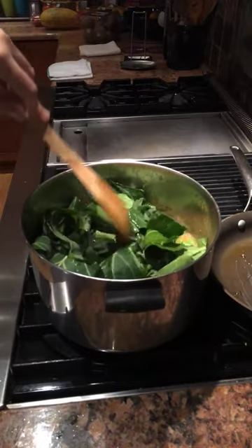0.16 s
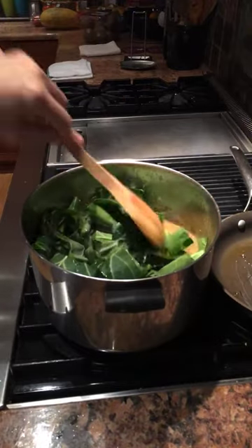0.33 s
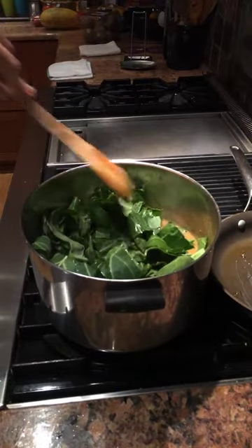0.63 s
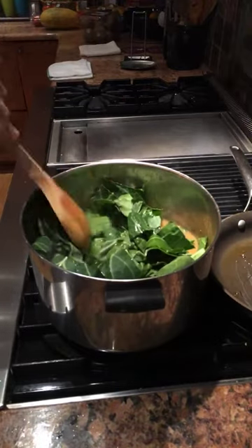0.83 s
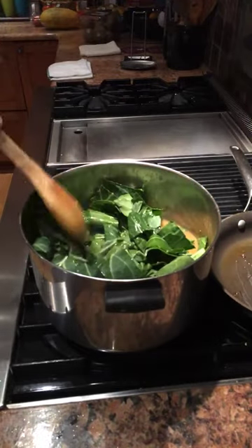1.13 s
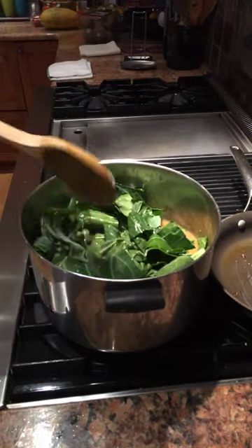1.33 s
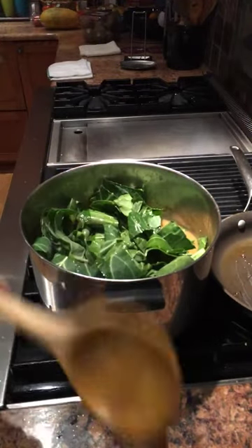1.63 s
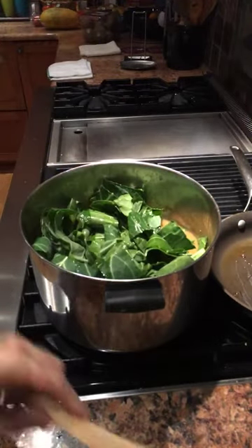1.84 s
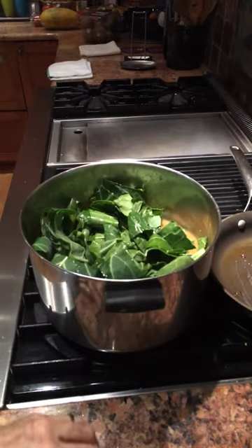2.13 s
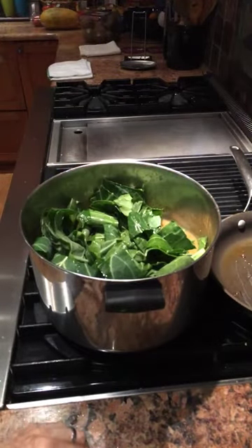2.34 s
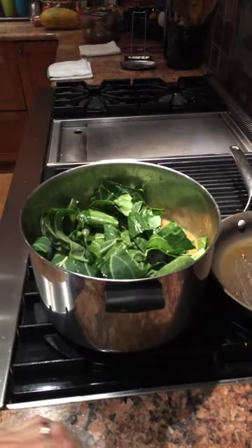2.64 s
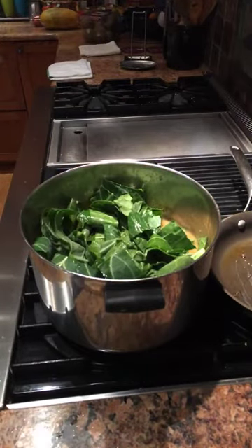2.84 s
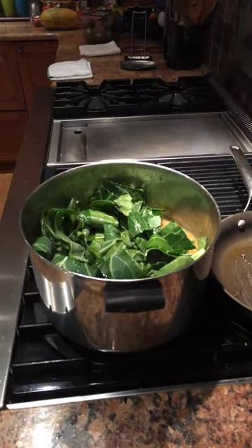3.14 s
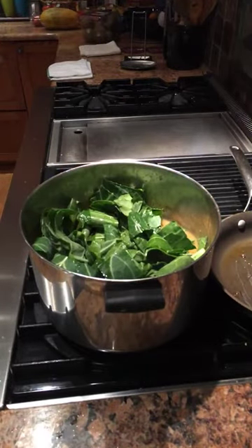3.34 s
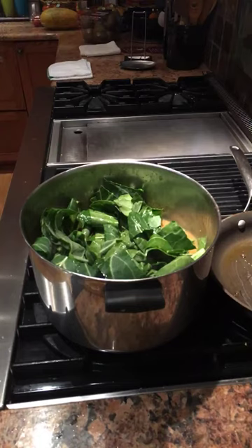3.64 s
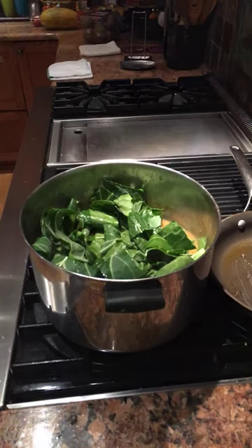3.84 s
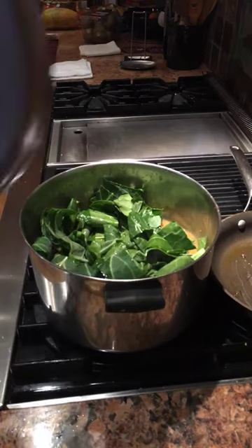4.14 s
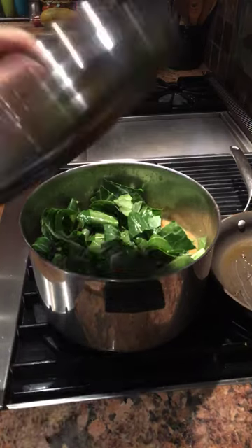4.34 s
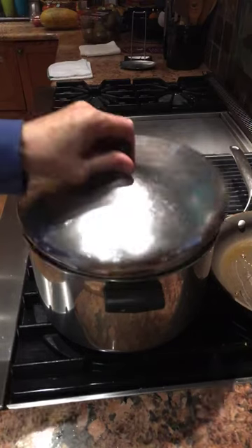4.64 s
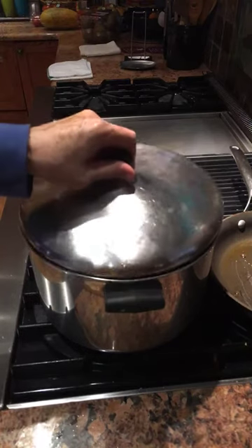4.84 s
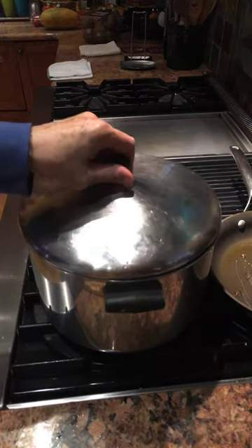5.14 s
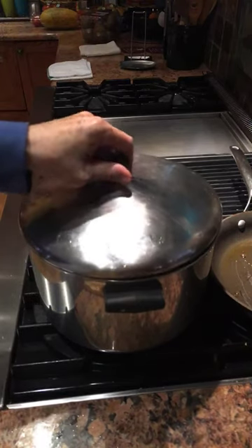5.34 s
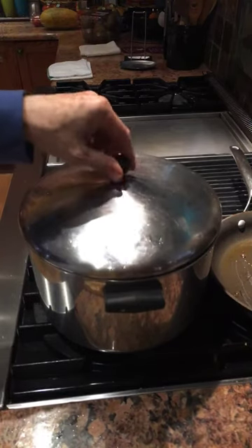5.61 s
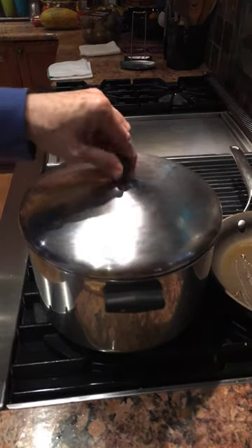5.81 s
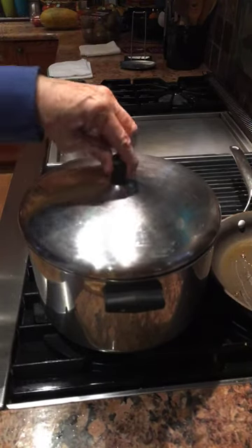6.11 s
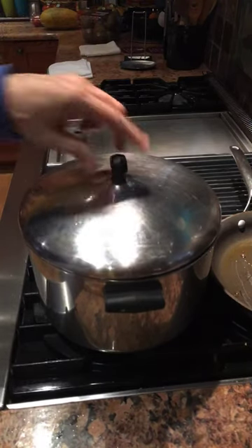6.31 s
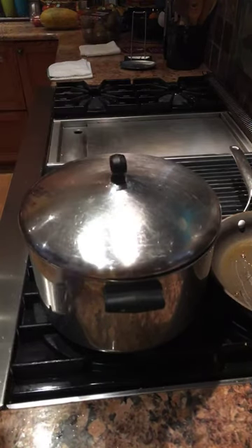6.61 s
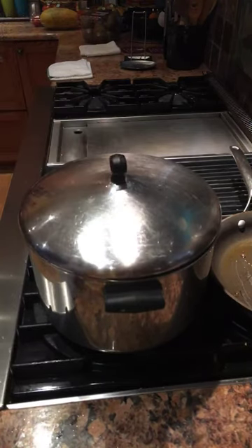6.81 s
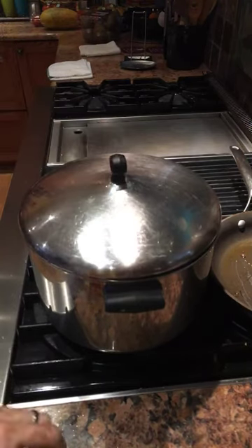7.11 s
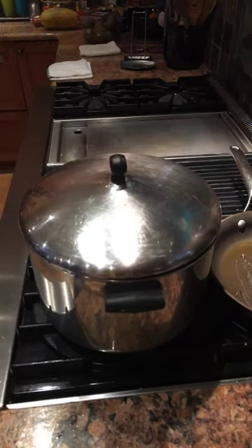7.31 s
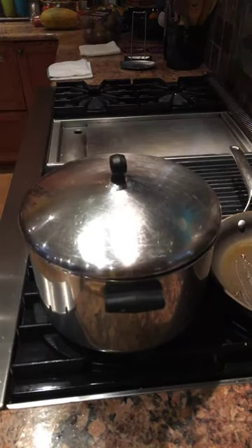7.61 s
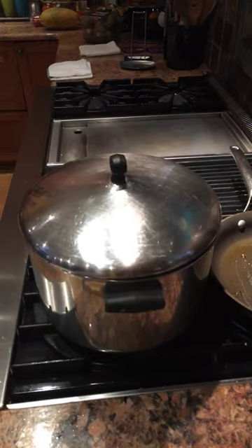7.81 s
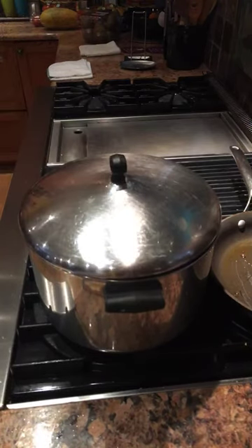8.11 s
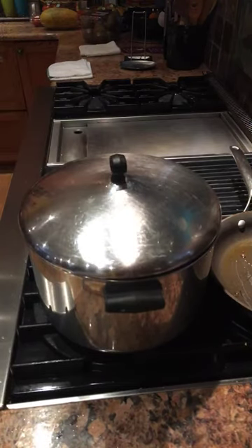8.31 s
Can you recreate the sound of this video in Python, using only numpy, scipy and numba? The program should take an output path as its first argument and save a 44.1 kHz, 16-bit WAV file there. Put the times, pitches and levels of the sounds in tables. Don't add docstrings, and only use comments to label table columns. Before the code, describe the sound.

Phone-close kitchen sound with slight hard-wall echo: muffled wooden taps on a filled pot, a faint wet squeak, then a very loud spoon clack on stone with a bright, short metallic rattle. After a quieter gap with a small lid click, a thin steel lid bounces onto the pot, rings briefly, is turned with a gritty metallic rub, and settles over steady fan hum and hiss.

```python
import sys
import numpy as np
from scipy import signal
from scipy.fft import rfft, irfft, next_fast_len
from scipy.io import wavfile
from scipy.ndimage import uniform_filter1d
from numba import njit

SR = 44100
rng = np.random.default_rng(int(sys.argv[2]) if len(sys.argv) > 2 else 0)


def log_audio(samples):
    frames = np.atleast_2d(samples).T
    limited = np.clip(frames, -1, 1)
    pcm = np.round(limited * 32767).astype(np.int16)
    wavfile.write(sys.argv[1], SR, pcm)


def volts_from_db(level):
    exponent = np.asarray(level, float) / 20
    return 10 ** exponent


N = 373084
TIME_S = np.arange(N) / SR
HARDER_DB = 1.77


def level(x, db):
    return x * volts_from_db(db) / np.sqrt(np.mean(x ** 2) + 1e-30)


def shaped(x, gain):
    size = next_fast_len(len(x))
    hz = np.arange(size // 2 + 1) * SR / size + 1
    return irfft(rfft(x, size) * gain(hz), size)[:len(x)]


def colour(x, points):
    hz, db = np.transpose(points)
    return shaped(x, lambda f: volts_from_db(np.interp(np.log(f), np.log(hz), db)))


def walk(rate_hz):
    k = int(SR / rate_hz)
    steps = np.repeat(rng.standard_normal(N // k + 1), k)
    return level(uniform_filter1d(uniform_filter1d(steps, k), k)[:N], 0)


def curves(table):
    s, *columns = np.transpose(table)
    return [np.interp(TIME_S, s, c) for c in columns]


def decay(t_s, t60_s):
    return np.exp(-np.log(1000) * t_s / t60_s)


def damped_after(s, fade_s):
    return np.exp(-np.maximum(TIME_S - s, 0) / fade_s)


def landing_db(hz, hard_db, spot_hz):
    return hard_db * np.log2(hz / 1500) + 9 * np.exp(-(np.log2(hz / spot_hz) / .35) ** 2)


def ring(modes, hard_db, spot_hz, share, longest_s, t_s, rough=0):
    hz, db, t60_s = np.transpose(modes)[:, :, None]
    luck = rng.standard_normal((3, len(modes), 1))
    fade = decay(t_s, np.clip(share * np.minimum(t60_s, longest_s), .005, 2))
    gain = volts_from_db(db + landing_db(hz, hard_db, spot_hz)) * volts_from_db(1.5 * luck[0])
    tone = np.sin(2 * np.pi * (hz + 6 * luck[1]) * t_s)
    twin = np.sin(2 * np.pi * (hz + (30 + .003 * hz) * luck[2]) * t_s)
    y = np.sum(gain * fade * (tone + rough * twin), axis=0)
    return y / np.max(np.abs(y))


def blows(hits, modes, crack, longest_s, stiff_db, push_s=0.00026):
    out = np.zeros(N + SR)
    points, t60_s = crack
    for s, db, share, spot_hz, *crack_db in hits:
        noise = rng.standard_normal(SR // 2)
        t_s = np.arange(int(SR * np.clip(share * max(t60_s, longest_s), .1, .5))) / SR
        hard_db = stiff_db + HARDER_DB * np.log2(spot_hz / 2000)
        burst = colour(noise[:len(t_s)], points)
        burst = shaped(burst, lambda f: volts_from_db(landing_db(f + 99, hard_db, spot_hz)))
        y = level(burst, sum(crack_db)) * decay(t_s, np.clip(t60_s * share, .004, 2))
        if modes:
            y += ring(modes, hard_db, spot_hz, share, longest_s, t_s, rough=.45)
        start = int(s * SR)
        out[start:start + len(t_s)] += volts_from_db(db) * y * (1 - np.exp(-t_s / push_s))
    return out[:N]


# pitch in Hz, level in dB, wander in Hz.
FAN_LINES = [(63.3, -46, 2.53), (150.7, -41, 1.2), (311, -62.5, 4), (463, -64.5, 3)]
# frequency in Hz, density in dB per Hz.
RUMBLE_COLOUR = [(8.8, -43), (15, -8.5), (42, 3.5), (77, 0), (103, -2), (167, -5.5), (190, -18), (301, -6),
                 (331, -9), (400, -35.5), (920, -120)]


def fan():
    out = level(colour(rng.standard_normal(N), RUMBLE_COLOUR), -45)
    for hz, db, wander_hz in FAN_LINES:
        gain = volts_from_db(db + 2 + 0.79 * wander_hz * walk(10))
        out += gain * np.sin(2 * np.pi * np.cumsum(hz + wander_hz * walk(10)) / SR)
    return out


# frequency in Hz, density in dB per Hz.
STEAM_COLOUR = [(210, -12.5), (350, -3), (800, -7.5), (1120, -11), (2000, -18.5), (3240, -21.5),
                (15300, -31), (16500, -57)]
REGION_EDGES_HZ = 1610, 5250
# level at rest in dB, dB per dB of bustle.
REGION_LEVELS = [(-55, 0.19), (-61.5, 1), (-67, 0.62)]
# time in seconds, level in dB.
BUSTLE_DB = [(0, -59), (.45, -56.5), (1.3, -64.5), (1.75, -55), (2.05, -60), (2.35, -55), (2.75, -63),
             (3.34, -63.5), (3.55, -57), (4.2, -57), (4.55, -62.5), (5, -53), (5.5, -62), (6.05, -56),
             (6.6, -62.5), (6.9, -53.5), (7.3, -61.5), (8.46, -59.5)]


def hiss():
    rest_db = -59.5
    grains = rng.standard_normal(N) * volts_from_db(0.58 * rng.exponential(size=N))
    noise = colour(grains, [(200, -55.0)] + STEAM_COLOUR)
    low, low_mid = [shaped(noise, lambda f: 1 / (1 + (f / hz) ** 6)) for hz in REGION_EDGES_HZ]
    bustle_db = curves(BUSTLE_DB)[0] - rest_db
    out = np.zeros(N)
    for part, (db, share) in zip((low, low_mid - low, noise - low_mid), REGION_LEVELS):
        out += level(part, 0) * volts_from_db(db + share * bustle_db + 1.8 * walk(12))
    return out


# start in seconds, level in dB, length share, favoured Hz.
TICK_HITS = [(.349, -66, 8, 9000), (.857, -46, 3.4, 3850), (.919, -55, 1, 6000), (1.136, -52.5, 3.9, 3200),
             (4.574, -43, 0.46, 1200), (5.242, -38.5, 1.1, 2113), (5.259, -34, 0.82, 602),
             (6.744, -42, 2.7, 3950), (6.746, -47, .6, 1260), (7.028, -44.5, 1.2, 1012),
             (7.292, -51, .5, 3300), (7.114, -37, 0.3, 1106), (7.168, -43, 0.51, 3740),
             (7.178, -49, 0.35, 3500), (7.312, -47, 0.57, 7240), (7.665, -47, 1.9, 750),
             (7.889, -46.5, 1.1, 1930), (8.011, -48, 0.93, 3020), (8.44, -50, 1.3, 1066)]
# start in seconds, peak in dB, length share, favoured Hz.
SNAP_HITS = [(4.32, -55, 0.09, 7000), (4.407, -50, .12, 4300), (4.555, -53, 0.073, 11000),
             (4.564, -49, .07, 13000), (4.574, -41, 0.077, 13000), (4.653, -51, .07, 13000),
             (4.66, -44, 0.08, 11700), (4.668, -50, .07, 12000), (4.695, -52, .07, 10500),
             (4.708, -48, .07, 11000), (4.805, -52, .07, 12500), (5.242, -53, .2, 9000),
             (5.258, -47, 0.27, 12000), (5.735, -42, 0.12, 6160), (7.178, -30, 0.093, 3650),
             (.7805, -33, 0.18, 2600), (1.1672, -37, .15, 2900), (2.4143, -19, 0.086, 4000),
             (2.511, -36, .15, 1100)]
# rows of frequency in Hz and dB per Hz, then t60 in seconds.
TICK_NOISE = ([(290, -43), (500, -4.5), (952, 0.5), (1840, -6), (3710, -15), (15300, -22), (16500, -40)],
               0.097)


def ticks():
    soft = blows(TICK_HITS, [], TICK_NOISE, .1, stiff_db=0.5, push_s=0.0012)
    return soft + blows(SNAP_HITS, [], TICK_NOISE, .1, stiff_db=1.0)


# centre in
# seconds, half length in seconds, level in dB, centre Hz.
NOISE_SWELLS = [(0.41, 0.031, -59, 9000), (2.2, 0.0621, -60.5, 9200), (3.62, 0.3, -61.5, 10900),
                (4.19, .087, -63, 11000), (2.2, 0.012, -38.5, 12000), (2.185, 0.045, -29.5, 11000),
                (7.04, .05, -57.5, 1400), (7.75, 0.17, -62, 3000), (2.709, 0.0096, -45, 7100),
                (5.921, 0.051, -48, 7400), (6.368, 0.027, -64, 5800), (6.898, 0.13, -58, 2300),
                (8.272, 0.1, -60.5, 10000)]


def noise_swells():
    grainy = rng.standard_normal(N) * volts_from_db(1.9 * walk(120))
    out = np.zeros(N)
    for s, half_s, db, hz in NOISE_SWELLS:
        band = shaped(grainy, lambda f: np.exp(-np.log2(f / hz) ** 2 / .7))
        out += level(band, db) * np.exp(-((TIME_S - s) / half_s) ** 2)
    return out


# start in seconds, peak in dB, ring length share, favoured Hz, crack in dB.
TAP_HITS = [
    (.7835, -33.5, 0.52, 646, 10.5),
    (.819, -44, 0.99, 410, 8),
    (.938, -47, 0.5, 795, 7.5),
    (1.17, -33, 0.47, 890, 8),
    (1.199, -46, 1, 880, 4),
    (2.51, -36.5, 0.53, 970, 7),
]
# mode in Hz, level in dB, t60 in seconds.
POT_MODES = [(650, 5, .07), (1280, -7, .15), (2520, -4, 0.026), (4000, -32, .083)]
# rows of frequency in Hz and dB per Hz, then t60 in seconds.
WOOD_NOISE = ([(120, -40), (200, 5), (997, -5), (1900, -19.5), (4130, -33), (5160, -37), (11600, -46),
               (16500, -59.5)], 0.15)


def spoon_taps():
    return blows(TAP_HITS, POT_MODES, WOOD_NOISE, 0.072, stiff_db=4.5)


# start in seconds, peak in dB, pitch in Hz, t60 in
# seconds.
THUD_HITS = [(0.82, -26, 374, 0.047), (0.81, -24.5, 79.5, 0.19), (1.169, -31, 320, 0.24),
             (1.199, -30, 88.5, 0.17), (1.277, -30.5, 65.5, 0.47), (2.117, -34, 105.4, 0.6),
             (2.101, -28.5, 319, 0.14), (2.706, -18.5, 320, 0.072), (2.703, -41.5, 1985, 0.31),
             (7.167, -37, 3750, 0.053), (7.179, -30, 970, 0.032), (3.392, -31, 284, 0.039),
             (4.822, -26, 302, 0.12), (4.9524, -16.5, 261, 0.081), (4.977, -23.5, 209, 0.21),
             (4.997, -25.5, 63.9, 0.98), (5.085, -16, 150.5, 0.17), (5.09, -26.5, 279, 0.106),
             (5.244, -15.5, 268, 0.077), (5.25, -35, 470, 0.13), (5.734, -29.5, 190, 0.11),
             (6.349, -31.5, 205, 0.091)]


def thuds():
    out, t_s = np.zeros(N + SR), np.arange(SR // 2) / SR
    for s, db, hz, t60_s in THUD_HITS:
        modes = [(hz, 0, t60_s), (1.3 * hz, -7, 0.98 * t60_s), (1.5 * hz, -12, .5 * t60_s)]
        y = ring(modes, 0, hz, 0.93, 0.92, t_s)
        start = int(s * SR)
        out[start:start + len(t_s)] += volts_from_db(db) * y * (1 - np.exp(-t_s / 0.00069))
    return out[:N]


# time in seconds, pitch in Hz, level in dB.
LEAF_SQUEAK = [
    (1.57, 4300, -80),
    (1.6, 4290, -64),
    (1.74, 4290, -63),
    (1.765, 4050, -59),
    (1.795, 3950, -58),
    (1.808, 3900, -85),
]


def leaf_squeak():
    hz, db = curves(LEAF_SQUEAK)
    gain = volts_from_db(db + 3 * walk(120)) * (db > -79)
    return gain * np.sin(2 * np.pi * np.cumsum(hz + 70 * walk(400)) / SR)


# start in seconds, peak in dB, ring length share, favoured Hz, crack in dB.
DROP_HITS = [(2.0905, 1.5, 0.41, 1345, -9), (2.094, 2, 0.82, 2750, -8.5), (2.097, -9, 0.56, 4410, -7),
             (2.1085, -8.5, 0.4, 4490, -1.5), (2.113, -8, .36, 1396, -9.5), (2.119, -12, 0.32, 2507, -1.5),
             (2.145, -4, 0.24, 1300, -10), (2.15, -9, 0.5, 2546, -12.5), (2.167, -23.5, .5, 3650, -4),
             (2.186, -23.5, .6, 1260, -3), (2.199, -20.5, .6, 4500, -5), (2.222, -27.5, .7, 2620, -6.5)]
# mode in Hz, level in dB, t60 in seconds.
COUNTER_MODES = [(673, -17, .15), (1248, -11, .09), (1298, -6, .11), (1360, -5, .09), (1580, -3, .14),
                 (2100, -14.5, .15), (2488, -2, .18), (2526, -3, .18), (3052, -12.5, .06), (3368, -13, .1),
                 (3614, -11, .11), (4005, -2, .13), (4560, -7, .14)]
# rows of frequency in Hz and dB per Hz, then t60 in seconds.
STONE_NOISE = ([(120, -54.5), (200, -20.5), (860, -17.5), (1270, 2), (2290, -17), (2510, -16), (4700, -7),
                (5350, -35.5), (5980, -18), (13500, -37.5), (16500, -36.5)], 0.1)


def spoon_drop():
    return blows(DROP_HITS, COUNTER_MODES, STONE_NOISE, 0.19, stiff_db=1.0)


# start in seconds, peak in dB, ring length share, favoured Hz, crack in dB.
JINGLE_HITS = [(2.094, -18, .15, 9000, 1), (2.110, -21, 3, 12500, -1), (2.1475, 4, 1.6, 13000, -15),
               (2.165, -13.5, 1.9, 7000, -11), (2.1735, -1, .8, 11230, -14.5),
               (2.1866, -2, 1.4, 11880, -13.5), (2.198, -9.5, .9, 13300, -14.5),
               (2.209, -11.5, 0.68, 13330, -11.5), (2.219, -14.5, 0.72, 11100, -11),
               (2.231, -17.5, 0.67, 12500, -6.5)]
SMALLEST_HITS = [
    (2.154, -15, 1.6, 15600, -18),
    (2.182, -12, 1.2, 15600, -14),
    (2.19, -14, 1, 15000, -12),
    (2.2, -18.5, 1, 14500, -12.5),
]
LATER_HITS = [
    (2.417, -24.5, 0.55, 11100, -8),
    (2.4205, -18, 0.89, 12700, -5.5),
    (2.4245, -18, .6, 14500, -6),
    (2.4285, -16, .6, 12000, -8),
    (2.434, -21.5, .6, 13500, -5.5),
]
# mode in Hz, level in dB, t60 in seconds.
TRINKET_MODES = [(6940, -15, .14), (8590, -14, .22), (9868, -15, .2), (11140, -10, .2), (11205, -4, .16),
                 (11883, -5, .14), (11965, -4, .14), (12730, -16, .14), (13040, -16, .1), (13312, -5, .16),
                 (13542, 1, .1), (13480, -6, .1)]
# mode in Hz, level in dB, t60 in seconds.
SMALLEST_MODES = [(14080, -7, .17), (14500, -8, .17), (14720, -9, .17), (15000, -8, .17), (15646, 5, .2)]
# rows of frequency in Hz and dB per Hz, then t60 in seconds.
TRINKET_NOISE = ([(290, -51.5), (500, -19.5), (2540, -11.5), (4550, -14.5), (4970, -18.5), (6760, -10),
                  (13200, -9.5), (15800, -8.5), (16500, -22)], 0.06)


def jingle():
    first = blows(JINGLE_HITS, TRINKET_MODES, TRINKET_NOISE, 0.26, stiff_db=-6.5)
    first += blows(SMALLEST_HITS, SMALLEST_MODES, TRINKET_NOISE, .26, stiff_db=-2.0)
    again = blows(LATER_HITS, TRINKET_MODES + SMALLEST_MODES, TRINKET_NOISE, .26, stiff_db=-4.5)
    return damped_after(2.238, .008) * first + damped_after(2.441, .006) * again


# start in seconds, peak in dB, ring length share, favoured Hz, crack in dB.
SETTLE_HITS = [
    (2.4145, -12.5, 0.3, 3720, -6.5),
    (2.4155, -24, .3, 1900, -7),
    (2.421, -21, 0.63, 2460, -7),
    (2.429, -25.5, 0.49, 760, -0.5),
    (2.477, -41, 0.53, 2500, 0),
    (2.516, -34.5, 1, 3230, -10),
    (2.7, -41, 1.03, 390, 4.5),
    (2.703, -46, 1.6, 1960, -10.5),
    (2.729, -45, 0.48, 5510, -4),
]
# mode in Hz, level in dB, t60 in seconds.
SETTLE_MODES = [(320, -17, .21), (716, 1.5, 0.18), (1265, -1, 0.17), (1360, -10, 0.092), (1890, 7, 0.16),
                (2510, -2, .2), (3200, -11, .09), (3840, -2, 0.065), (4470, 4, 0.081), (6800, -9, .12),
                (8110, -5, .08), (9450, -12, .08)]
# rows of frequency in Hz and dB per Hz, then t60 in seconds.
SETTLE_NOISE = ([(180, -59), (300, -42), (682, -8.5), (923, -9), (4460, -6.5), (9980, -24), (10900, -18),
                 (14700, -19), (16500, -31)], 0.14)


def spoon_settle():
    return blows(SETTLE_HITS, SETTLE_MODES, SETTLE_NOISE, 0.16, stiff_db=-1.5)


# start in seconds, peak in dB, ring length share, favoured Hz, crack in dB.
LIFT_HITS = [
    (3.3895, -25, 1.2, 2320, -3.5),
    (3.396, -27.5, 2, 3140, -9),
    (3.889, -47.5, 2.4, 5150, -1.5),
]
# mode in Hz, level in dB, t60 in seconds.
RIM_MODES = [(1250, -3, 0.29), (1504, 2.5, 0.15), (2180, -7, 0.22), (2500, -9, 0.29), (2815, -8, .12),
             (2880, 1, .1), (3120, -7, 0.1), (3170, 3, 0.066), (3620, -12, .12), (4590, -3, 0.13),
             (4710, -9, .12), (5700, -20, .1), (6500, -16, .12), (6638, -15, .14)]
# rows of frequency in Hz and dB per Hz, then t60 in seconds.
LIFT_NOISE = ([(180, -49), (300, -0.5), (1480, -18), (1660, -7.5), (3240, -8), (13700, -18.5),
               (16500, -23.5)], 0.068)


def lid_lift():
    return blows(LIFT_HITS, RIM_MODES, LIFT_NOISE, 0.24, stiff_db=-2.1)


# start in seconds, peak in dB, ring length share, favoured Hz, crack in dB.
CLATTER_HITS = [(4.7178, -15, 1.02, 1400, -18), (4.7195, -27, 0.84, 12000, -8),
                (4.722, -37, 0.54, 3250, -14), (4.819, -24, 0.43, 1460, -9),
                (4.822, -20.5, 0.76, 1900, -20), (4.823, -25.5, 0.39, 4060, -10),
                (4.836, -21.5, 0.51, 1880, -27), (4.848, -24.5, 0.53, 880, -22),
                (4.9525, -22, 0.75, 930, -11), (4.954, -21, 1.1, 1860, -12), (4.955, -23, 0.54, 4150, -12),
                (4.958, -21.5, 0.84, 3200, -11.5), (4.978, -40, .5, 9000, -2),
                (4.989, -21.5, 0.79, 920, -12), (4.992, -23, 0.95, 3160, -12.5),
                (5.082, -21.5, 0.27, 4330, -4.5), (5.083, -23.5, 0.66, 12500, -6),
                (5.086, -24, 1.04, 1880, -7.5), (5.103, -27, 1.3, 2240, -11)]
# mode in Hz, level in dB, t60 in seconds.
LID_MODES = [(860, -3, .17), (1245, -13, .1), (1340, -8, .1), (1826, -12, .9), (1880, -6, .22),
             (1910, 0, .15), (1990, -11, .25), (2140, -11, .25), (2375, -8, .2), (2610, -15, .2),
             (3160, -11, .2), (3260, -13, .15), (3380, -14, .22),
             (3780, -18, .15), (4000, -17, .2), (4210, -11, .22), (4400, -14, .27), (4550, -12, .15),
               (5230, -23, .1), (5500, -17, .15), (6275, -18, .1), (7000, -24, .15), (7460, -22, .16),
               (8850, -22, .1), (9840, -24, .15),
             (8400, -24, .15), (9520, -24, .2), (11010, -24, .17), (11450, -22, .2), (11950, -19, .13),
              (12720, -24, .17), (13250, -20, .12), (14300, -21, .15), (14750, -21, .13), (15000, -20, .08),
              (15490, -20, .07)]
# rows of frequency in Hz and dB per Hz, then t60 in seconds.
STEEL_NOISE = ([(200, 1), (400, 4.5), (900, -6.5), (1900, -10), (3590, -15), (5100, -18), (13000, -28),
                (16500, -38)], 0.12)


def lid_clatter():
    modes = LID_MODES
    return damped_after(5.242, .02) * blows(CLATTER_HITS, modes, STEEL_NOISE, .9, stiff_db=0.6)


# start in seconds, peak in dB, ring length share, favoured Hz, crack in dB.
CATCH_HITS = [(5.247, -42, .6, 2300, -14), (5.262, -40, .5, 2300, -14), (5.277, -38, .3, 2300, -16),
              (5.35, -49, .6, 4250, -14), (5.372, -50, .6, 4250, -14), (5.396, -47, .4, 4250, -14),
              (5.412, -49, .3, 4250, -14), (5.782, -39, .6, 1750, -16), (5.802, -41, .3, 4120, -12),
              (5.826, -44, .3, 2100, -10), (5.855, -42, .4, 4150, -14), (5.861, -34, .5, 1750, -16),
              (5.875, -33, .3, 1750, -16), (5.903, -37, .5, 4150, -12), (5.918, -38, .3, 4200, -8),
              (5.98, -39, .4, 4450, -8), (6.003, -39, .3, 4450, -10), (6.022, -39, .5, 2150, -14),
              (6.036, -38, .25, 2150, -14), (6.105, -46, .4, 2150, -10)]
# mode in Hz, level in dB, t60 in seconds.
SEATED_MODES = [(1930, 0, .2), (2150, 0, .2), (3200, -8, .2), (4170, 0, .2), (4320, -3, .2), (4470, -3, .2)]


def lid_catches():
    return blows(CATCH_HITS, SEATED_MODES, STEEL_NOISE, .2, stiff_db=0)


# time in seconds, rub level in dB, share of ringing in dB.
TURN_LEVELS = [
    (5.72, -79, -7),
    (5.736, -52, 4),
    (5.764, -57, -5),
    (5.86, -38.5, -0.5),
    (5.92, -36, -5),
    (5.99, -37, -5),
    (6.045, -43, -1),
    (6.09, -53.5, 0),
    (6.25, -78, 2),
]
# frequency in Hz, density in dB per Hz.
RUB_COLOUR = [(240, -1), (640, -14), (1630, -12.5), (2030, -7), (2930, -11.5), (4240, -15.5),
              (13500, -14.5), (15700, -18), (16500, -45)]
# mode in Hz, level in dB.
HELD_MODES = [(1960, 0), (2150, -5), (4150, -5), (4420, -13), (3250, -8), (2700, -13), (6290, -14)]


def lid_turn():
    db, ringing_db = curves(TURN_LEVELS)
    slips = rng.standard_normal(N) * volts_from_db(2.2 * rng.exponential(size=N) + 2.2 * walk(160))
    shift_db = 30 * np.clip(TIME_S - TURN_LEVELS[3][0], -.2, .2)
    dome = np.zeros(N)
    for k, (hz, mode_db) in enumerate(HELD_MODES):
        tone = signal.lfilter(*signal.iirpeak(hz, 35, fs=SR), slips)
        dome += volts_from_db(mode_db) * tone * volts_from_db(1.5 * walk(30) - (-1) ** k * shift_db)
    turning = np.interp(TIME_S, [5.7, 5.73, 6.2, 6.3], [0, 1, 1, 0])
    rub = level(colour(slips, RUB_COLOUR), 0)
    return turning * volts_from_db(db) * (rub + volts_from_db(ringing_db) * level(dome, 0))


# centre in Hz, t60 in seconds.
ECHO_T60_S = [(250, .45), (1300, .45), (4000, .38), (12000, .3)]


def room(x):
    t_s, tail = np.arange(SR) / SR, 0
    for hz, t60_s in ECHO_T60_S:
        band = shaped(rng.standard_normal(SR), lambda f: np.exp(-np.log2(f / hz) ** 2 / 1.1))
        tail = tail + band * decay(t_s, t60_s) * (1 - np.exp(-t_s / 0.0042))
    return signal.fftconvolve(x, volts_from_db(-16) * tail / np.sqrt(np.sum(tail ** 2)))[:N]


def scene():
    spoon = spoon_taps() + leaf_squeak() + spoon_drop() + jingle() + spoon_settle()
    lid = lid_lift() + lid_clatter() + lid_catches() + lid_turn()
    near = ticks() + noise_swells() + thuds() + spoon + lid
    return (near + room(near) + fan() + hiss())[None]


def causal(db):
    c = irfft(db * np.log(10) / 20)
    half = len(c) // 2
    folded = np.concatenate([c[:1], 2 * c[1:half], c[half:half + 1], 0 * c[half + 1:]])
    return np.exp(rfft(folded))


@njit
def follow(x, attack, release):
    e, out = 0., np.empty(len(x))
    for i in range(len(x)):
        e += (abs(x[i]) - e) * (attack if abs(x[i]) > e else release)
        out[i] = e
    return out


def low_pass(x):
    return signal.sosfilt(signal.butter(12, 16860, fs=SR, output="sos"), x)


# centre in Hz, width in Hz, gain in dB.
NARROW_BANDS = [(5030, 160, -6.5), (5900, 90, 4), (6500, 90, 4), (10450, 280, -6)]


def record(dry):
    def narrow_db(f):
        return sum(db * np.exp(-((f - hz) / width_hz) ** 2) for hz, width_hz, db in NARROW_BANDS)

    def top_db(f):
        return -30 / (1 + np.exp(np.clip((15900 - f) / 40, -50, 50)))

    x = shaped(dry[0], lambda f: causal(narrow_db(f)))
    heard = follow(x, 1 / (0.0038 * SR), 1 / (.12 * SR))
    x = x * np.minimum(1, volts_from_db(-22.5) / (heard + 1e-9)) ** 0.17
    x = x / (1 + x ** 4) ** (1 / 4)
    x = shaped(x, lambda f: causal(top_db(f)))
    return low_pass(x[None])


dry = scene()
out = record(dry)
log_audio(out)
```